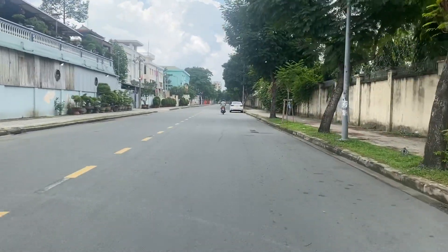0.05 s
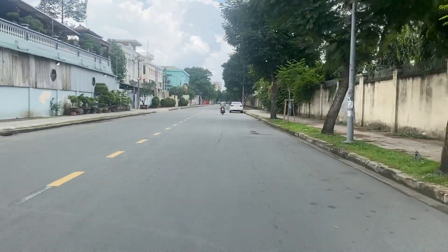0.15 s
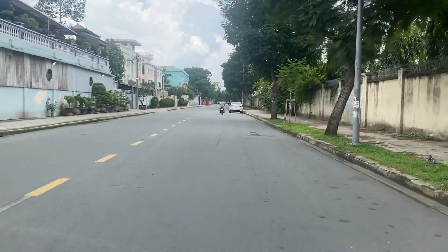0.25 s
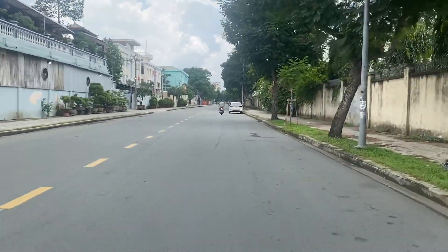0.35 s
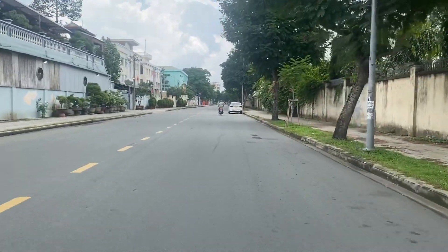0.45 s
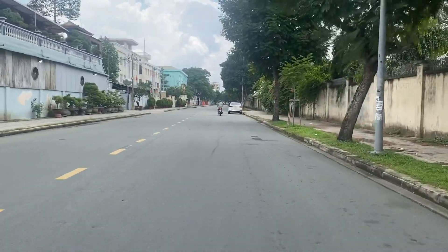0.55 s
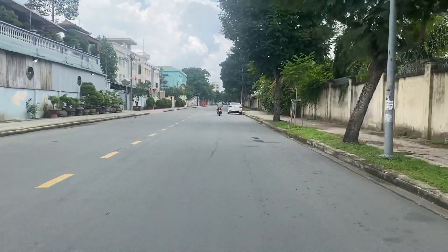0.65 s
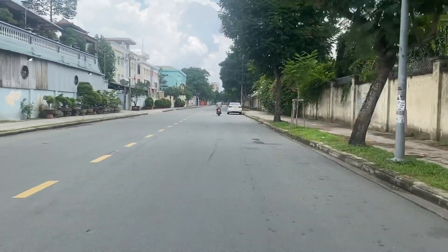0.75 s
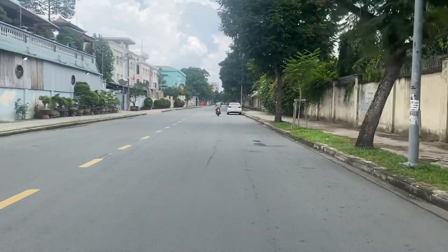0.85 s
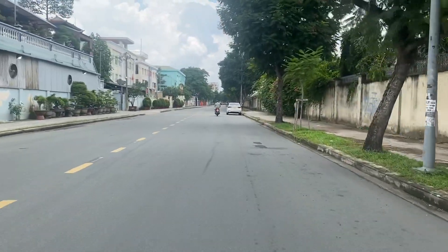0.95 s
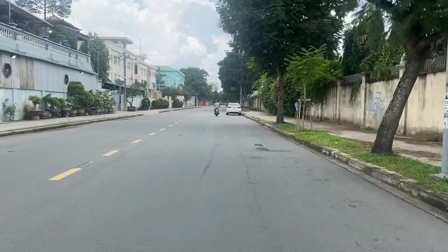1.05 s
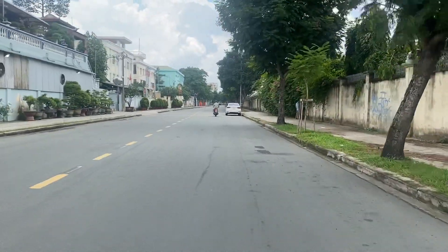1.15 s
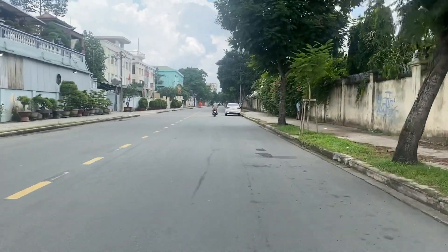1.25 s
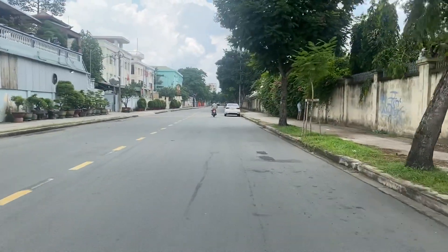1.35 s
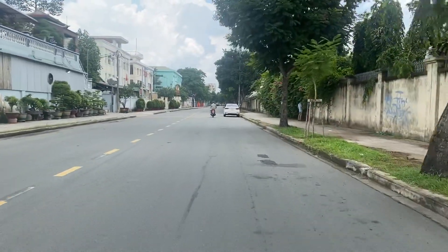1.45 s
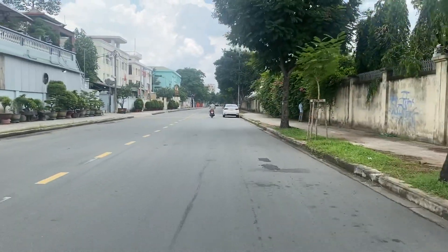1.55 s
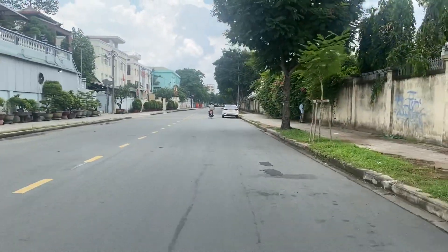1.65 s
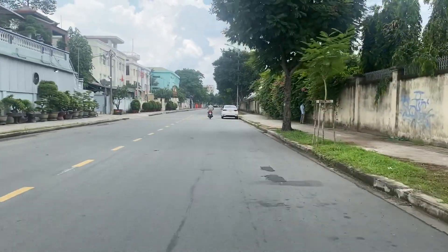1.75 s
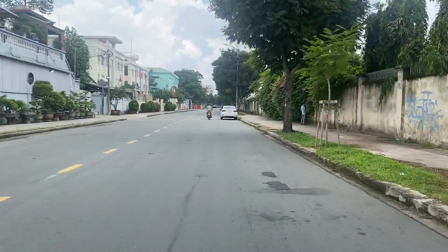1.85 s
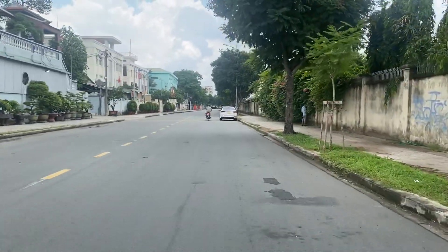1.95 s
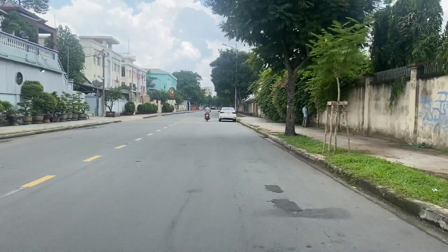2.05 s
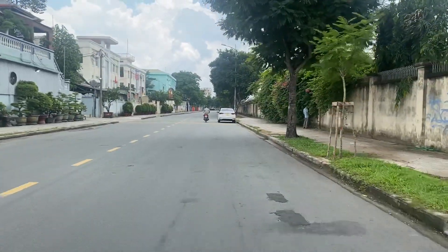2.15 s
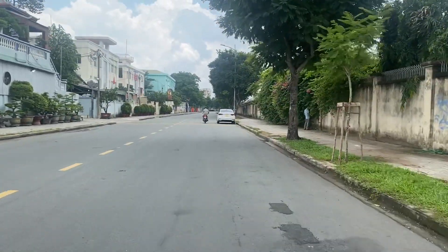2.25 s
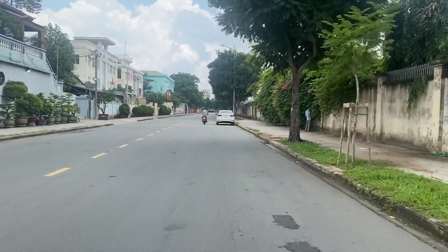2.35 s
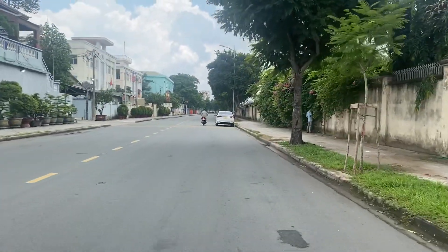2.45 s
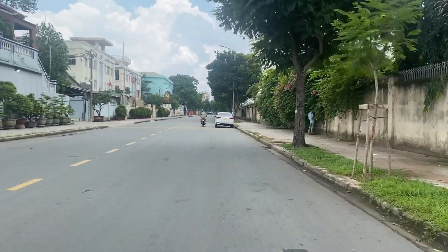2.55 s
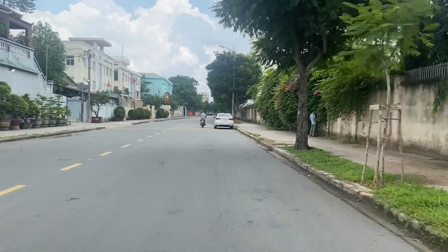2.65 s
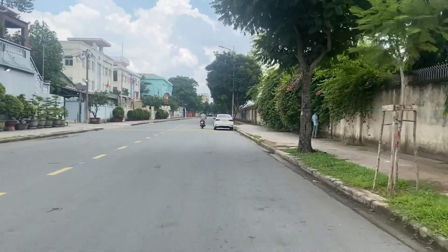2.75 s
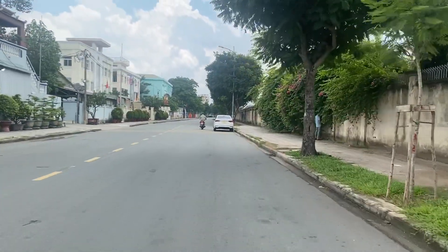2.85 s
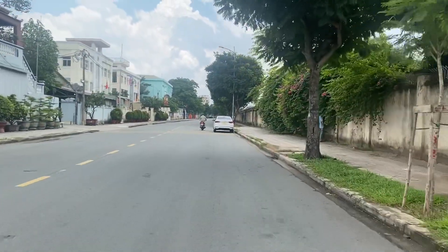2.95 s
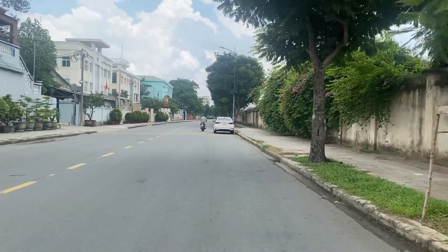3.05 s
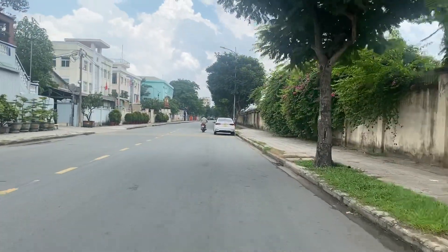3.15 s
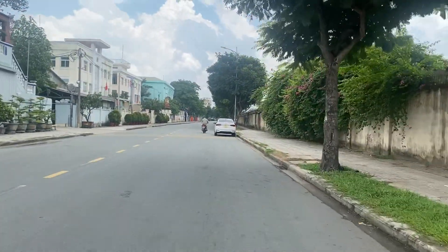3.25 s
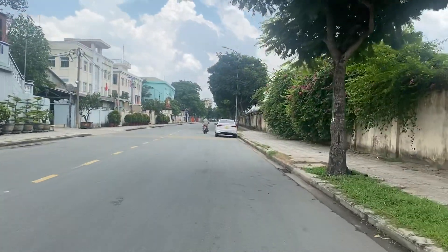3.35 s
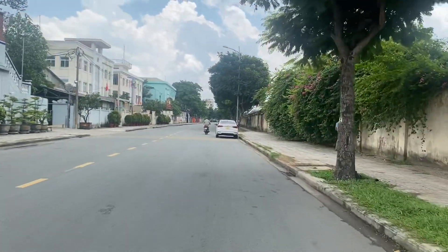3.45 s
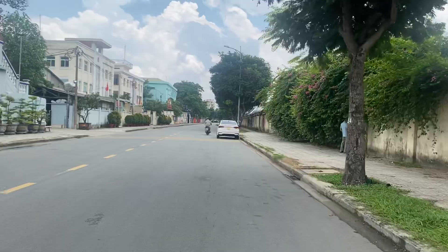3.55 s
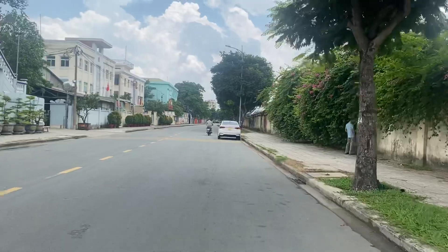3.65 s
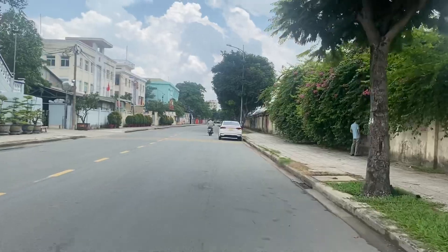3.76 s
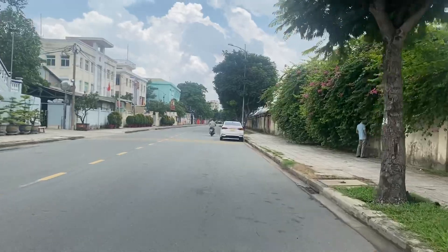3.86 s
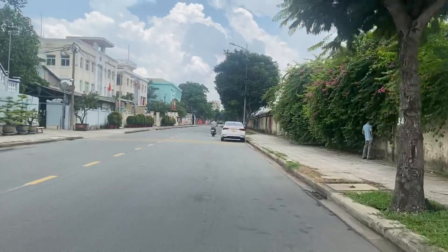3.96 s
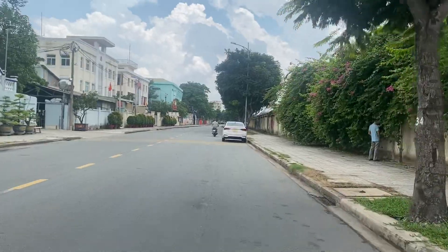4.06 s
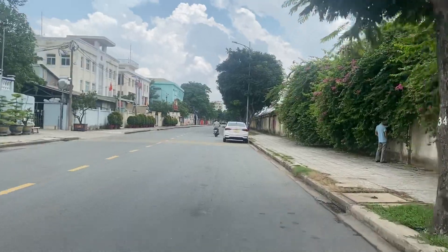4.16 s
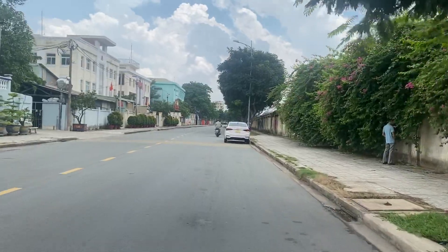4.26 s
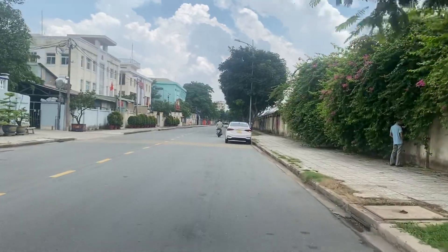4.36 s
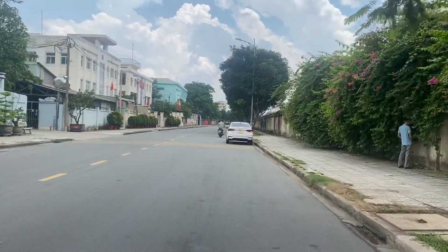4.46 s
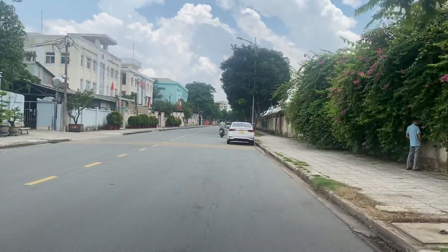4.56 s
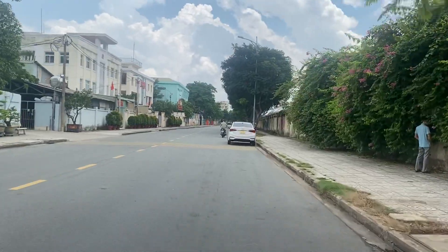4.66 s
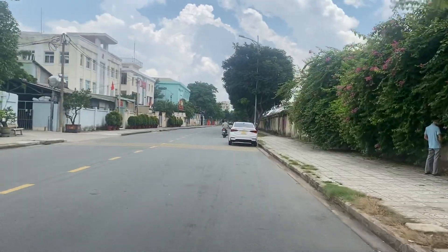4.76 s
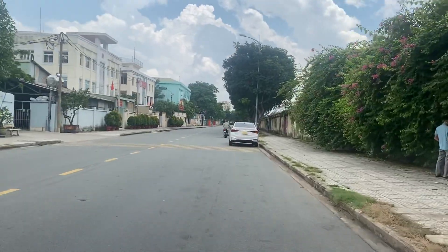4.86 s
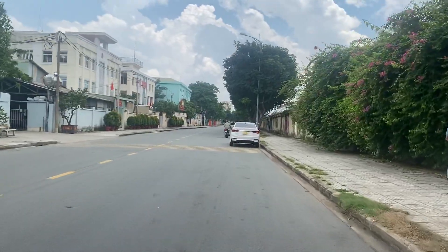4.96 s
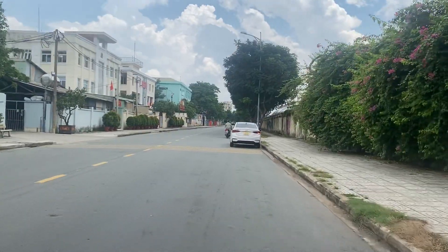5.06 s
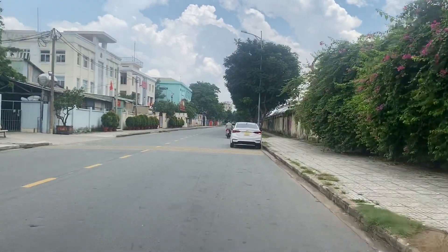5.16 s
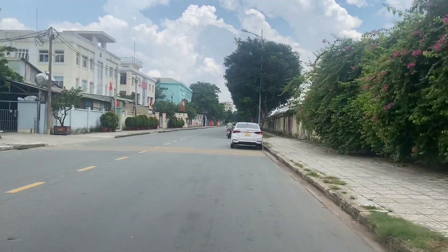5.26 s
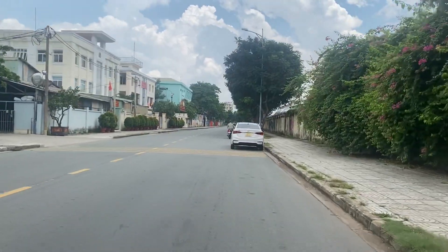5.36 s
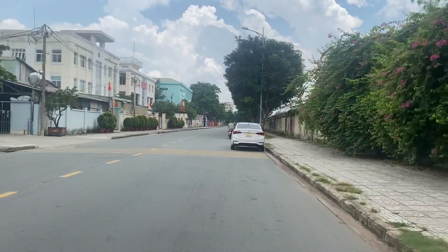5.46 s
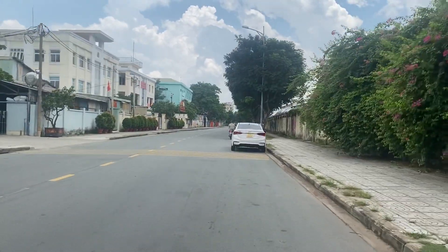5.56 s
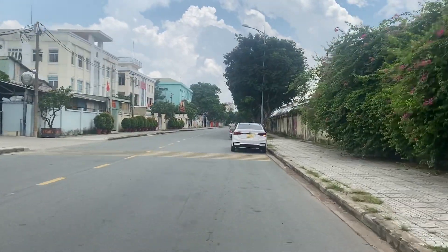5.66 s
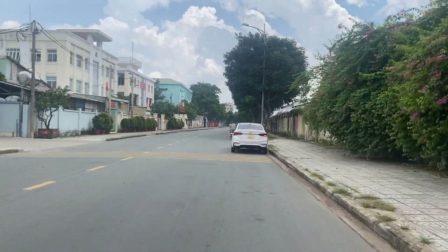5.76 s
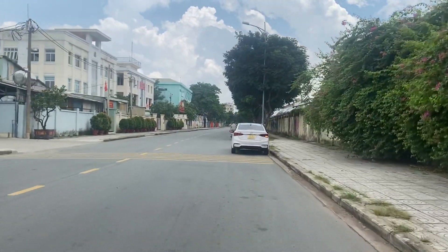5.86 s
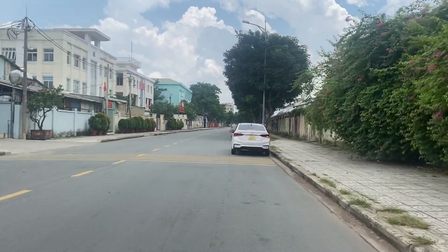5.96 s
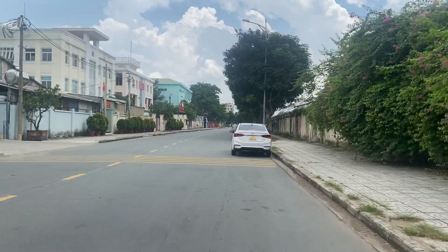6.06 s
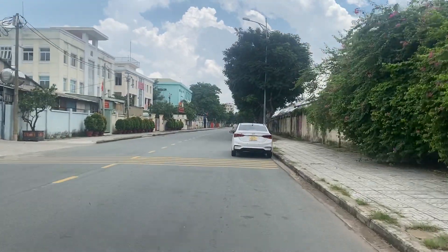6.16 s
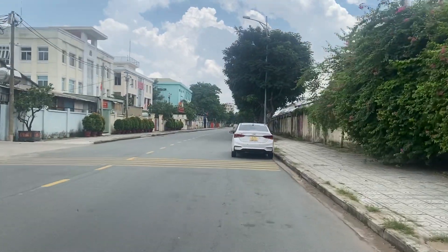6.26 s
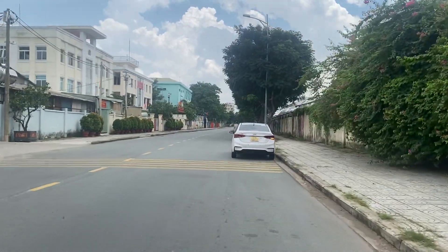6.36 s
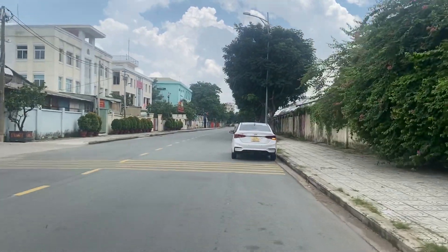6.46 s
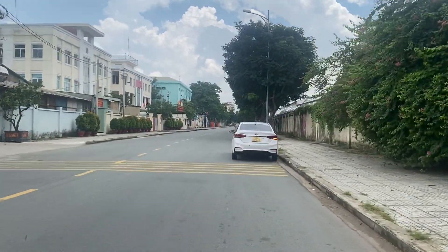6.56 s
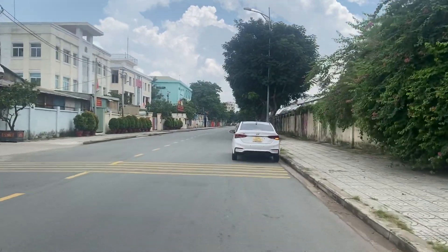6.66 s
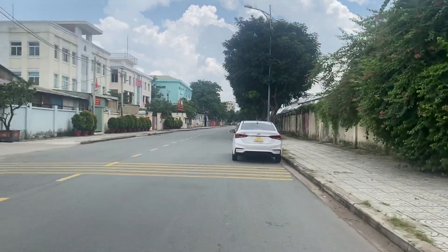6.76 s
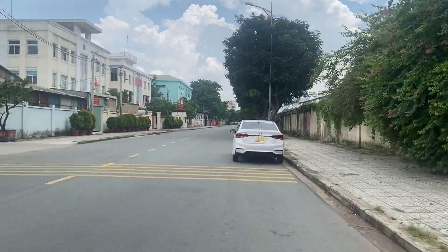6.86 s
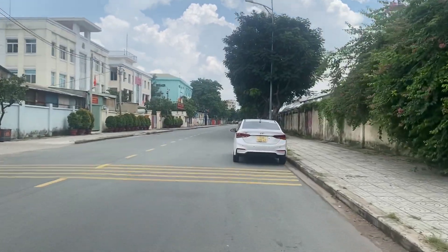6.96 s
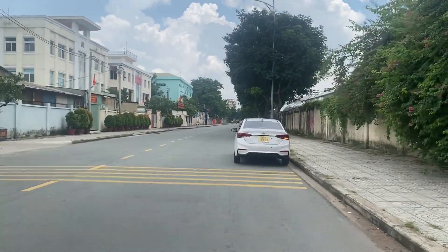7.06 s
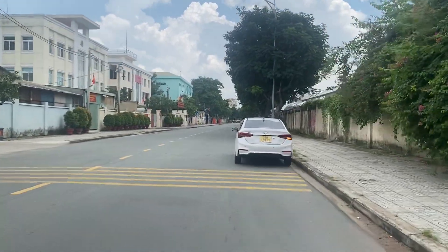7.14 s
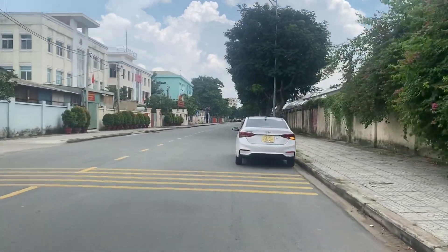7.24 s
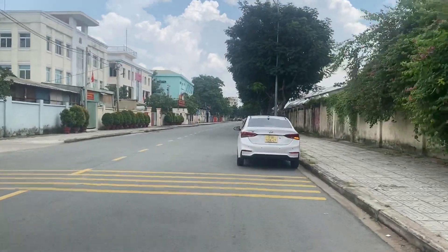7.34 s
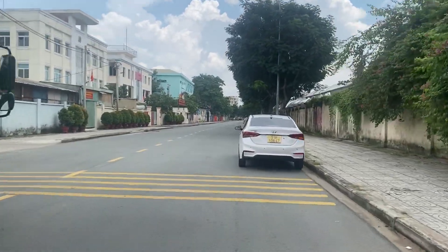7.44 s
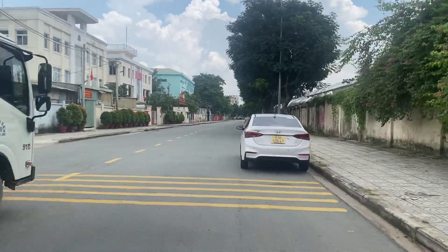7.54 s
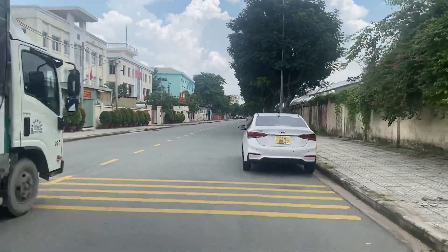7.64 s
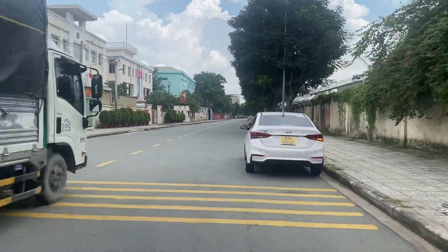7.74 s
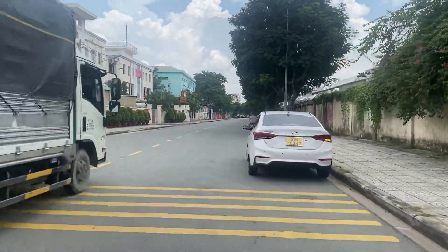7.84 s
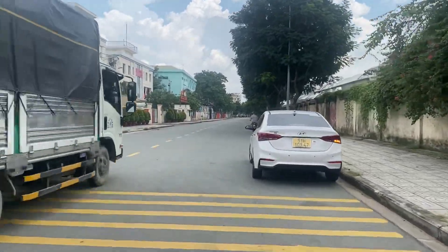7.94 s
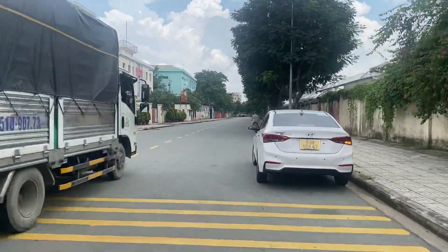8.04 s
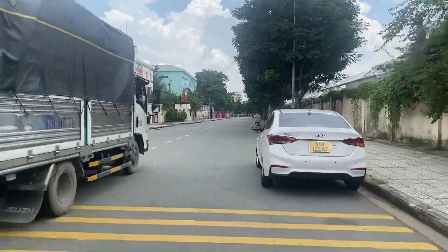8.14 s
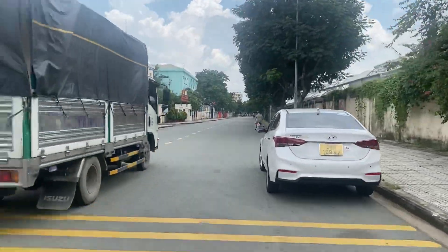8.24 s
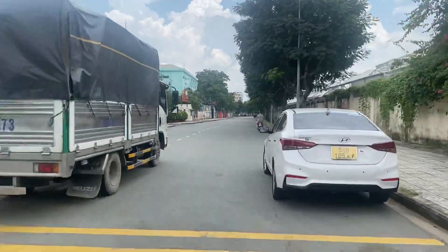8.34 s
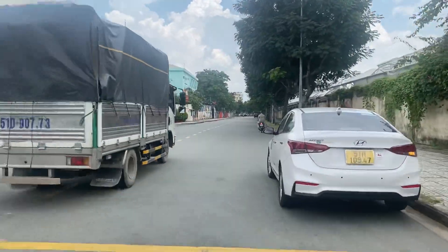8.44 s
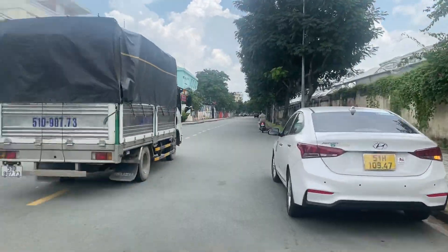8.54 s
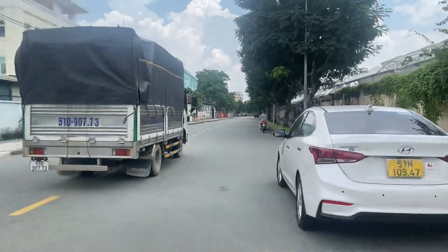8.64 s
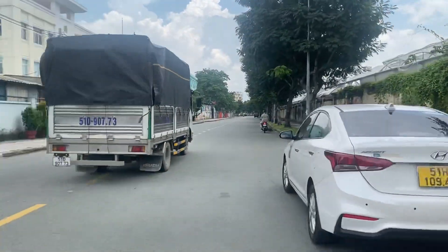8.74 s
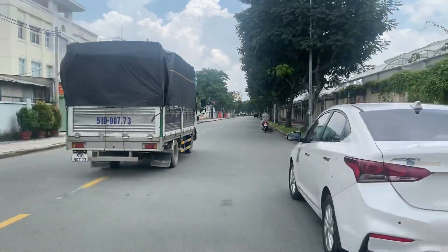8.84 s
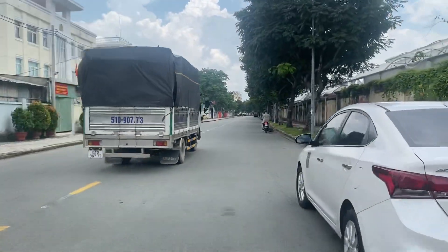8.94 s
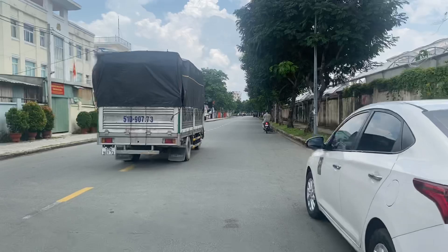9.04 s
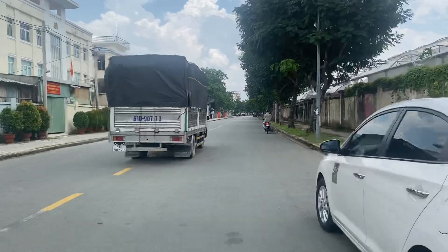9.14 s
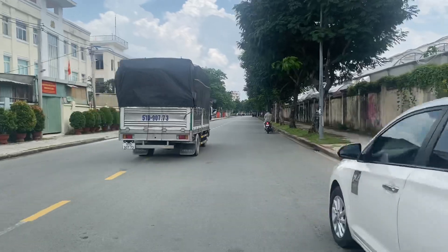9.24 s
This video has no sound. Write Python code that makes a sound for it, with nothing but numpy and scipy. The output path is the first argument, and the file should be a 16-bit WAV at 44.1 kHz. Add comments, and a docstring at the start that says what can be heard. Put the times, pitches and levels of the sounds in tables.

```python
"""A steady drone and gusty, popping wind, while a diesel truck comes up from behind, passes and pulls away.
The listener is a phone held on a moving motorbike on a quiet city street.
Tyres and engine are coloured noise with a faint hum, a whine and ticks of grit. The headwind is band-passed
noise swelling in gusts, and each sharp eddy is a short cycle or two of falling pitch.
The truck is noise whose treble pulses with the knock of four cylinders, over a clean firing note."""
import sys
import numpy as np
from scipy import signal
from scipy.fft import rfft, irfft, next_fast_len
from scipy.io import wavfile

SR = 44100
rng = np.random.default_rng(int(sys.argv[2]) if len(sys.argv) > 2 else 0)


def generate_wav(sig):
    """Save sig (samples, or channels by samples) to the path in sys.argv[1] as 16-bit PCM at SR."""
    pcm = np.round(np.clip(np.atleast_2d(sig).T, -1, 1) * 32767).astype(np.int16)
    wavfile.write(sys.argv[1], SR, pcm)


N = 410123
SIZE = next_fast_len(N)   # a length that transforms quickly
HZ = np.arange(SIZE // 2 + 1) * SR / SIZE   # every frequency of the transform
SECONDS = np.arange(N) / SR


def from_db(db):
    """Turn decibels into a gain."""
    return 10 ** (np.asarray(db) / 20)


def rms_one(x):
    """Scale to rms 1."""
    return x / np.sqrt(np.mean(x ** 2) + 1e-20)


def in_time(rows):
    """Draw straight lines between the rows of a table, giving each column at every sample."""
    s, *columns = np.transpose(rows)
    return [np.interp(SECONDS, s, column) for column in columns]


def shape(points):
    """Gain at every frequency, from (frequency [Hz], level [dB]) points."""
    hz, db = np.transpose(points)
    return from_db(np.interp(np.log(HZ + 1), np.log(hz), db))


def ridges(rows):
    """Gain of resonances, each lifting or lowering a band around its own frequency."""
    return from_db(sum(db / (1 + (2 * (HZ - hz) / width) ** 2) for hz, width, db in rows))


def drift(rate_hz):
    """Slow random wandering with rms 1: noise smoothed twice, drawn at every 40th sample."""
    r = np.exp(-80 * np.pi * rate_hz / SR)
    noise = rng.standard_normal(N // 40 + 2002)
    slow = signal.lfilter([1], [1, -2 * r, r * r], noise)[2000:]   # drop the start-up
    return np.interp(np.arange(N) / 40, np.arange(len(slow)), rms_one(slow))


def band(x, low_hz, high_hz, order=2):
    """Keep only the frequencies between two limits."""
    return signal.sosfilt(signal.butter(order, [low_hz, high_hz], "band", fs=SR, output="sos"), x)


def octaves(gain, patchy_db, rate_hz):
    """Two unrelated noises of one colour, split in overlapping octaves that flicker; rms 1 before flicker."""
    coloured = rfft(rng.standard_normal((2, SIZE))) * gain
    coloured /= np.sqrt(np.mean(irfft(coloured, SIZE) ** 2))
    place = np.clip(np.log2((HZ + 1) / 40), 0, 8)   # octaves above 40 Hz
    together = drift(rate_hz / 2)   # flicker shared by all octaves
    layers = []
    for k in range(9):
        share = np.clip(1 - abs(place - k), 0, 1)
        flicker = from_db(patchy_db * (.6 * together + drift(rate_hz)))
        layers.append(irfft(coloured * share, SIZE)[:, :N] * flicker)
    return layers


def ports(pair, column):
    """Two microphone ports: the right hears a lagged share of the left plus noise of its own."""
    # how alike the ports hear: (frequency [Hz], near sound [-1 to 1], truck [-1 to 1])
    likeness = [(40, .5, .7), (130, .72, .65), (200, .9, .8), (300, .9, .9), (470, .75, .75),
                (700, .45, .45), (1200, .3, .35), (1800, 0.3, 0.5), (3170, 0.35, 0.3), (4300, 0.27, 0.5),
                (5060, -0.3, 0.44), (6500, 0.6, -0.33), (7700, -0.098, 0.18), (8300, 1, 1),
                (15500, .97, 0.5)]
    # how far the right port lags: (frequency [Hz], near sound [turns], truck [turns])
    port_lag = [(0, .07, .07), (90, .15, .1), (200, .12, .08), (400, .1, .09), (700, .17, .18),
                (1200, .25, .28), (2000, .4, .1), (2400, .55, 0), (3000, .85, -.15), (4300, 1, -.1),
                (6600, 1, 0), (8900, 1.5, .5), (15500, 3, 2)]
    rows, lag = np.transpose(likeness), np.transpose(port_lag)
    alike = np.clip(np.interp(HZ, rows[0], rows[column]), -.995, .995)
    turns = np.interp(HZ, lag[0], lag[column])
    left, own = rfft(pair, SIZE)
    right = alike * left * np.exp(-2j * np.pi * turns) + np.sqrt(1 - alike ** 2) * own
    return np.array([pair[0], irfft(right, SIZE)[:N]])


def panned(x, pan_db):
    """Tilt a pair sideways by a level difference, left minus right."""
    return x * from_db(np.array([pan_db / 2, -pan_db / 2]))


def drone():
    """The motorbike's tyres and engine: flickering noise with broad resonant ridges."""
    # colour of tyres and engine: (frequency [Hz], relative level [dB])
    road_colour = [(30, -40), (60, 1), (120, -9.5), (200, -10), (450, -11), (750, -19.5), (1250, -14.5),
                   (1800, -22), (3000, -26.5), (3500, -26.5), (4200, -27.5), (6000, -33.5), (8000, -41.5),
                   (11500, -48), (15500, -57)]
    # ridges in the drone: (frequency [Hz], width [Hz], boost [dB])
    road_ridges = [(540, 80, 2), (610, 80, -4), (1080, 70, 4), (1350, 150, 2), (2080, 120, 2),
                   (2950, 300, 2), (6050, 400, 3)]
    layers = octaves(shape(road_colour) * ridges(road_ridges), patchy_db=1.5, rate_hz=22)
    return from_db(-37) * sum(layers)


def hum():
    """A faint low sine of moving pitch and wavering level, perhaps the motorbike's own engine."""
    # path of the hum: (time [s], pitch [Hz], level before a 3 dB lift and waver [dB])
    hum_path = [(0, 99, -47), (4.4, 98, -43), (5.9, 96, -41), (6.5, 93, -40), (7.1, 96, -36),
                (8.0, 108, -35), (8.5, 108, -43), (9.3, 106, -46)]
    hz, db = in_time(hum_path)
    return from_db(db + 3 + 2.5 * drift(3)) * np.sin(2 * np.pi * np.cumsum(hz) / SR)


def whine():
    """A faint whine: a tone of moving pitch in each ear, blurred by chance to a narrow band."""
    # path of the whine: (time [s], pitch [Hz], level [dB])
    whine_path = [(0, 4090, -60), (.2, 4200, -58), (.32, 4200, -66), (.55, 4290, -59), (.68, 4150, -66),
                  (.8, 4110, -59), (1.3, 4140, -64), (1.62, 4180, -55.5), (1.78, 4170, -63),
                  (1.9, 4160, -56), (2.07, 4150, -55), (2.15, 4150, -68), (9.3, 4150, -80)]
    width_hz = 85
    hz, db = in_time(whine_path)
    turn = 2 * np.pi * np.cumsum(hz) / SR
    tones = [drift(width_hz) * np.cos(turn) + drift(width_hz) * np.sin(turn) for side in "LR"]
    return from_db(db) * rms_one(np.array(tones))


def grit():
    """Grit and chain ticks: bursts of bright noise that fade by 60 dB in 52 ms."""
    # the ticks: (time [s], starting level of the noise before its band-pass [dB])
    tick_list = [(1.6706, -50), (1.7833, -47), (1.857, -48), (2.398, -44), (2.5153, -47), (2.6883, -49),
                 (2.8514, -51), (2.9188, -52), (2.9517, -49), (3.897, -52), (4.062, -51), (4.3246, -47),
                 (4.8556, -46), (5.023, -48), (5.3527, -39), (5.685, -45), (9.1805, -52)]
    fade = np.zeros(N)
    fade[[round(s * SR) for s, db in tick_list]] = from_db(np.array(tick_list)[:, 1])
    fade = signal.lfilter([1], [1, -from_db(-60 / (0.052 * SR))], fade + 1e-18)
    return band(fade * rng.standard_normal((2, N)), 4500, 12400)


def gusty(steady_db, column, lag_s, stretch):
    """Wind level in dB: the power of the steady wind plus a bell-shaped swell for every gust."""
    # the gusts: (middle before lag [s], length before stretch [s], boom level [dB], flutter level [dB])
    gust_list = [(0.022, 0.16, -24.5, -22), (0.1, 0.037, -28, -27), (0.137, 0.042, -22, -29),
                 (0.187, 0.028, -32, -31), (0.257, 0.028, -24, -21), (0.285, 0.021, -18, -26),
                 (0.427, 0.068, -29, -26), (0.519, 0.064, -20, -33), (.67, 0.095, -35, -37),
                 (1.104, 0.36, -33.5, -34), (1.408, 0.089, -22.5, -31), (1.485, 0.016, -22, -33),
                 (1.625, 0.039, -29, -42), (1.786, 0.018, -34, -25), (2.064, 0.2, -24.5, -35),
                 (2.592, 0.065, -22, -40), (2.772, 0.04, -25, -50), (3.053, 0.27, -28.5, -45),
                 (3.235, 0.045, -22, -40), (3.717, 0.1, -26, -27.5), (4.147, 0.055, -23.5, -54),
                 (4.537, 0.45, -44, -41), (4.7, 0.032, -24, -29), (4.735, 0.018, -34, -21.5),
                 (4.749, 0.025, -20, -23), (4.796, 0.026, -31, -27), (4.865, 0.022, -31, -49),
                 (5.166, 0.025, -21, -43), (5.564, 0.072, -38, -33), (5.7, 0.31, -25.5, -31),
                 (5.891, 0.018, -41, -22), (6.025, 0.12, -28, -29.5), (6.241, 0.023, -24, -18.5),
                 (6.289, 0.067, -20, -20.5), (6.312, 0.024, -26, -19.5), (6.334, 0.033, -27, -19),
                 (6.362, 0.03, -18, -42), (6.426, 0.023, -22, -26), (6.517, 0.022, -20, -22.5),
                 (6.74, 0.092, -34, -40), (7.137, 0.11, -17, -24.5), (7.775, 0.019, -33, -24),
                 (7.825, 0.083, -25, -21.5), (7.853, 0.025, -31, -20.5), (8.068, 0.035, -51, -23),
                 (8.099, 0.044, -27, -18), (8.134, 0.064, -19, -19), (8.163, 0.016, -17, -20.5),
                 (8.206, 0.056, -19.5, -25), (8.37, 0.065, -22, -27.5), (8.51, 0.047, -19, -25),
                 (8.649, 0.026, -12, -26), (8.674, 0.041, -34, -21.5), (8.733, 0.064, -16.5, -27.5),
                 (8.791, 0.057, -17.5, -33), (8.911, 0.015, -33, -21.5), (9.09, 0.022, -19, -40),
                 (9.028, 0.017, -23, -25), (9.147, 0.026, -22, -20.5), (9.172, 0.024, -15.5, -25.5)]
    rise = 0.45   # length of the rise as a share of the fall
    squareness = 1.7   # 2 = bell, more = flatter top
    power = from_db(2 * steady_db)
    for row in gust_list:
        middle, length = row[0] + lag_s, stretch * row[1]
        start, stop = round((middle - 2 * length) * SR), round((middle + 2 * length) * SR)
        near = slice(max(start, 0), stop)
        away = (SECONDS[near] - middle) / length
        bell = np.exp(-abs(2 * away / np.where(away < 0, rise, 1)) ** squareness)
        power[near] += from_db(2 * row[column]) * bell
    return 10 * np.log10(power)


def wind():
    """Turbulence at the ports: lumpy boom, and flutter in short clumps that brighten with the gust."""
    # steady headwind: (time [s], boom level [dB], flutter level [dB])
    headwind = [(0, -31, -36.5), (1, -36.5, -39.5), (2.6, -36, -40), (3.4, -34, -36.5), (4.2, -35.5, -42.5),
                (5.2, -32.5, -36.5), (6.2, -31, -32.5), (6.9, -37, -35), (7.35, -36, -33.5),
                (7.9, -31, -27), (8.3, -33.5, -37.5), (9.0, -31, -32.5), (9.3, -45, -54)]
    steady_boom_db, steady_flutter_db = in_time(headwind)
    # the boom of a gust comes a little later than its flutter
    boom_db = gusty(steady_boom_db, column=2, lag_s=0.0092, stretch=0.59)
    flutter_db = gusty(steady_flutter_db, column=3, lag_s=0, stretch=0.63)
    white = rng.standard_normal((3, 2, N))
    boom = from_db(boom_db + 0.42 * np.tanh(drift(17.4))) * rms_one(band(white[0], 42.3, 128.4))

    # eddies pass in a few milliseconds, all pitches at once
    clumps_db = 5.1 * np.tanh(0.39 * drift(31))
    gust_share = 1 - from_db(2 * (steady_flutter_db - flutter_db))
    clumps_db = clumps_db * (1 - 0.75 * gust_share)   # gusts iron out most of the clumping
    body_db = flutter_db + 1.18 * drift(10.4) + clumps_db
    body = from_db(body_db) * rms_one(band(white[1], 101.0, 672, order=3))

    # stronger gusts shed smaller, brighter eddies: the edge climbs 2.83 dB for each dB of flutter
    edge_db = -36.5 + 2.83 * (flutter_db + 24.0)
    edge = from_db(edge_db + clumps_db) * rms_one(band(white[2], 380, 1400, order=3))
    return boom + body + edge


def pops():
    """Sharp eddies hitting a port: a cycle or two falling in pitch while dying, with a short bright crack."""
    # the eddies: (time [s], pop level [dB], base pitch [Hz], crack level [dB])
    eddies = [(0.009, -20, 410, -31), (0.022, -18, 405, -28), (0.044, -23, 443, -9), (0.055, -22, 394, -15),
              (0.093, -24, 387, -14), (0.132, -25, 434, -29), (0.195, -24, 447, -22),
              (0.244, -28, 428, -33), (0.256, -23, 520, -32), (0.341, -31, 550, -42),
              (0.428, -25, 450, -32), (0.493, -27, 436, -19), (0.512, -27, 288, -21),
              (1.406, -20, 390, -34), (1.773, -23.5, 302, -36), (2.406, -20.5, 447, -32),
              (2.671, -23.5, 400, -26), (2.9, -25, 447, -34), (3.697, -23, 412, -23),
              (3.717, -22.5, 363, -33), (4.505, -26, 490, -38), (4.593, -21.5, 337, -37),
              (4.722, -17, 420, -21), (4.744, -21, 298, -21), (4.751, -17.5, 394, -30),
              (4.757, -21, 332, -13.5), (4.816, -26, 586, -25), (5.056, -24.5, 330, -42),
              (5.399, -27, 388, -34), (5.874, -22.5, 300, -31), (6.198, -24, 494, -35),
              (6.233, -17, 402, -25), (6.237, -21, 330, -6), (6.283, -23, 560, -14), (6.287, -20, 330, -20),
              (6.293, -19, 450, -13), (6.303, -26, 300, -24), (6.31, -32, 400, -18), (6.316, -21, 450, -16),
              (6.326, -15, 580, -19), (6.336, -16, 320, -12), (6.363, -24, 545, -21),
              (6.415, -20, 320, -32), (6.717, -20, 249, -27), (7.09, -20, 553, -30), (7.186, -19, 450, -13),
              (7.8, -13, 490, -30), (7.928, -18.5, 304, -30), (8.059, -23, 428, -36),
              (8.088, -13.5, 400, -21), (8.092, -32, 500, -20), (8.097, -26, 453, -13),
              (8.103, -18, 406, -20), (8.115, -18, 402, -7), (8.124, -23, 505, -12), (8.128, -26, 450, -11),
              (8.136, -17.5, 400, -15), (8.16, -24, 340, -29), (8.212, -21, 430, -33),
              (8.377, -19, 450, -30), (8.582, -18.5, 396, -25), (8.641, -18.5, 404, -26),
              (8.685, -27, 390, -12), (8.722, -13.5, 620, -12), (8.781, -23, 306, -17),
              (8.912, -35, 370, -29), (8.952, -21, 550, -32), (9.024, -23, 312, -32),
              (9.076, -21, 514, -14), (9.136, -32, 400, -19), (9.144, -27, 456, -22),
              (9.165, -27, 245, -11), (9.221, -22.5, 424, -31)]
    start_s, port_lag_s = .0028, .00021   # pause before each eddy; later arrival at the right port
    top, halving_cycles = 2.5, .8   # starting multiple of the base pitch; cycles until it has halved
    rise_cycles, fade_cycles = .45, 2.73   # in cycles of the base pitch
    crack_lag_s, crack_s = .002, .0007   # delay and half length
    out = np.zeros((2, N))
    t = np.arange(round(.07 * SR)) / SR - np.array([[0], [port_lag_s]])
    t = np.maximum(t, 0)
    for (s, db, hz, crack_db), (start, spread) in zip(eddies, rng.random((len(eddies), 2))):
        cycles = hz * t
        turn = top * halving_cycles * np.log(1 + cycles / halving_cycles)
        swell = 1 - np.exp(-(cycles / rise_cycles) ** 2)
        pop = 2 * swell * np.exp(-cycles / fade_cycles) * np.sin(2 * np.pi * (turn + start))
        crack_hz = 800 + 800 * spread
        crack = np.exp(-((t - crack_lag_s) / crack_s) ** 2) * np.sin(2 * np.pi * (crack_hz * t + start))
        i = round((s + start_s) * SR)
        out[:, i:i + t.shape[1]] += (from_db(db) * pop + from_db(crack_db) * crack)[:, :N - i]
    return out


def diesel_knock(firings, depth):
    """Each firing starts a knock that dies away within it; the four cylinders differ in strength."""
    # relative strength of each cylinder's knock in firing order: (level [dB])
    cylinder_db = [1.5, -7, 1.5, -30]
    strength = from_db(np.array(cylinder_db)[np.floor(firings).astype(int) % 4])
    knock = 1 + 4.0 * np.clip(depth, 0, 1) * strength * np.exp(-(firings % 1) / .2)
    return knock / knock.mean()


def firing_note(firings, note_db):
    """A sine at the firing rate, slightly late on the right; an overtone sings out for a moment."""
    lag_turns = [[0], [.05]]   # left, right
    note = from_db(note_db + 0.7 * drift(5.4)) * np.sin(2 * np.pi * (firings - lag_turns))
    sings = np.exp(-((SECONDS - 7.25) / 0.38) ** 2)
    overtone = np.sin(2 * np.pi * 3.5 * firings)   # a half order of the firing note
    return note + from_db(-34 + 2.8 * drift(4.2)) * sings * overtone


def truck():
    """A passing diesel: roar with treble pulsed by the cylinders' knock, over the clean firing note."""
    # the truck, at first a far wash among other traffic: (time [s], roar level [dB], then relative to it:
    # clatter near 5 kHz [dB], hiss near 10 kHz [dB], tyre body near 640 Hz [dB])
    passing = [(0, -42.5, -8, -5, -35), (1.4, -39.5, -5, -8.5, 6), (2.8, -37.5, -2.5, -8.5, 1),
               (4.2, -36.5, 1.5, -6.5, 4), (5.0, -34, -1, -4.5, 1), (6.05, -31, 1, -4, -1),
               (6.3, -28, 2.5, -5.5, 3), (6.6, -28, 3, -5, -2.5), (6.94, -27.5, 1, -4, 5),
               (7.33, -22.5, 2, 2.5, 4.5), (7.72, -22.5, -1.5, 0, 4.5), (8.1, -22.5, -4, -5, -2),
               (8.3, -25.5, -4, -6, 1), (8.8, -27.5, -5, -7, 5), (9.3, -29.5, -4, -8, 2)]
    # firing note: (time [s], pitch [Hz], level [dB], knock depth [0-1])
    firing_path = [(0, 61.2, -47, 0.46), (4.5, 59, -36, 0.07), (5.1, 58, -28, 0), (5.75, 59, -27.5, 0),
                   (6.0, 58.6, -33, 0.03), (6.45, 59, -32, 0), (6.7, 59.8, -25.5, 0.03),
                   (7.05, 59.9, -21.5, 0.06), (7.35, 60, -21, 0.14), (7.65, 60, -22, 0.1),
                   (7.85, 59.9, -26, 0.04), (8.35, 60, -28.5, 0), (8.9, 58.5, -31, 0.1),
                   (9.3, 56, -35, 0.03)]
    # colour of the roar: (frequency [Hz], relative level [dB])
    roar_colour = [(40, 1.5), (100, -7.5), (200, -9.5), (400, -11), (750, -14), (1000, -13.5),
                   (1400, -16.5), (3000, -24.5), (3600, -26.5), (6000, -28.5), (8000, -36), (11000, -34.5),
                   (13500, -49), (15500, -37)]
    # body and tyre ridges: (frequency [Hz], width [Hz], boost [dB])
    truck_ridges = [(390, 60, 2), (640, 80, -5), (760, 140, 2), (1450, 300, 3), (2250, 300, 2),
                    (3000, 350, 3), (5900, 600, 3)]
    roar_db, clatter_db, hiss_db, body_db = in_time(passing)
    hz, note_db, depth = in_time(firing_path)

    # it draws level at 7.6 s and swings from behind on the left to ahead
    abreast_s, swing_s = 7.6, .4
    behind_pan_db, ahead_pan_db = 1.5, -0.5   # left minus right
    passed = (1 + np.tanh((SECONDS - abreast_s) / swing_s)) / 2
    pan_db = behind_pan_db + (ahead_pan_db - behind_pan_db) * passed

    firings = np.cumsum(hz) / SR
    firings -= firings[round(7.377 * SR)]   # the first listed cylinder fires at this moment
    knock = diesel_knock(firings, depth)
    layers = octaves(shape(roar_colour) * ridges(truck_ridges), patchy_db=1.1, rate_hz=24)
    # the engine end comes first and lifts the band near 2.5 kHz
    front_db = 4 * np.exp(-((SECONDS - 6.91) / 0.32) ** 2)
    treble = layers[5] + from_db(front_db) * layers[6]
    treble = treble + from_db(clatter_db) * layers[7] + from_db(hiss_db) * layers[8]
    roar = sum(layers[:4]) + from_db(body_db) * layers[4] + knock * treble
    note = firing_note(firings, note_db)
    return panned(ports(from_db(roar_db) * roar, column=2), pan_db) + note


def swelling(x):
    """Bands that rise or dip for a while, unevenly, as walls, hedges and the truck go by."""
    # the swells: (middle [s], length [s], frequency [Hz], width [Hz],
    # left boost before waver [dB], right boost before waver [dB])
    swell_list = [(0.5, 1.4, 2090, 80, 7, 4), (0.7, 1.4, 1370, 120, 3, 6), (1.2, 1.8, 1080, 50, 6, 4),
                  (1.5, 1.0, 1390, 90, 6, 3), (1.9, 0.9, 520, 70, 6, 5), (1.9, 1.0, 2100, 80, 4, 5),
                  (3.6, 1.4, 2950, 130, 4, 4), (7.4, 0.8, 2650, 200, -2, -2), (7.5, 1.0, 3550, 400, -4, -4),
                  (7.4, 0.8, 1000, 150, -5, -2), (2.9, 1.8, 1220, 90, 6, 4), (3.4, 0.9, 545, 50, 5, 5),
                  (3.4, 0.8, 420, 50, 4, 5), (4.4, 0.6, 530, 60, 6, 7), (5.0, 1.8, 1150, 90, 4, 1),
                  (5.0, 1.6, 1420, 150, 2, 4), (5.2, 1.0, 2980, 130, 5, 5), (6.2, 0.5, 520, 70, 4, 4),
                  (6.4, 0.35, 72, 10, 8, 8), (6.55, 0.6, 1850, 200, 5, 4), (6.95, 0.3, 2330, 120, 4, 4),
                  (7.2, 1.1, 760, 150, 5, 5), (7.4, 0.6, 2200, 220, 4, 3), (7.45, 0.7, 3080, 220, 4.5, 4.5),
                  (7.5, 0.5, 490, 55, 7, 5), (7.6, 0.8, 390, 55, 7, 7), (7.6, 1.1, 1380, 170, 6, 3),
                  (8.2, 0.8, 1450, 200, 3, 5), (8.3, 1.6, 5900, 400, 3, 2), (8.7, 1.2, 2580, 170, 7, 4),
                  (9.0, 0.7, 1350, 150, 2, 3)]
    out = x.copy()
    waver = 1 + .27 * drift(10)
    shifts = rng.integers(0, N, len(swell_list))   # each swell wavers from another point
    for (middle, length, hz, width, *db), shift in zip(swell_list, shifts):
        start, stop = round((middle - length) * SR), round((middle + length) * SR)
        near = slice(max(start, 0), min(stop, N))
        bell = np.exp(-(2 * (SECONDS[near] - middle) / length) ** 2)
        bell = bell * np.roll(waver, shift)[near]
        # a resonator picks out the band
        r = np.exp(-np.pi * width / SR)
        feedback = [1, -2 * r * np.cos(2 * np.pi * hz / SR), r * r]
        ring = signal.lfilter([(1 - r * r) / 2, 0, (r * r - 1) / 2], feedback, x[:, near])
        out[:, near] += (from_db(np.outer(db, bell)) - 1) * ring
    return out


def scene():
    """Near sounds share one port response, the truck has its own; pops are added after the swells."""
    near_sound = drone() + hum() + whine() + grit() + wind()
    return swelling(ports(near_sound, column=1) + truck()) + pops()


def record(dry):
    """The deepest bass is cut, peaks are rounded, the top is cut."""
    dry = signal.sosfilt(signal.butter(4, 42, "high", fs=SR, output="sos"), dry)
    dry = .8 * np.tanh(dry / .8)
    return signal.sosfilt(signal.cheby2(14, 70, 15900, fs=SR, output="sos"), dry)


dry = scene()
out = record(dry)
generate_wav(out)
```